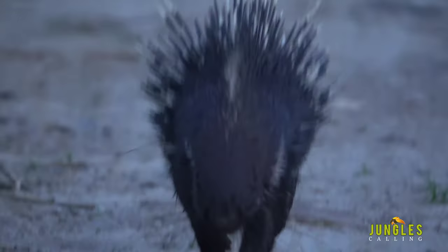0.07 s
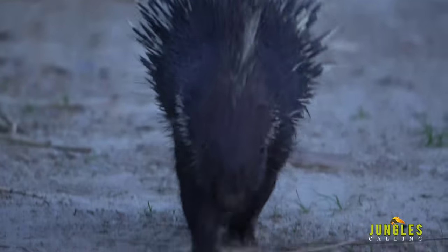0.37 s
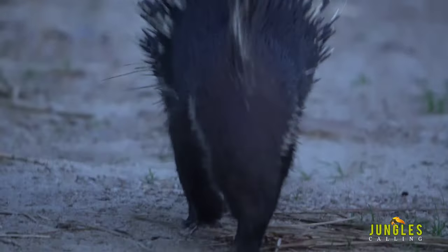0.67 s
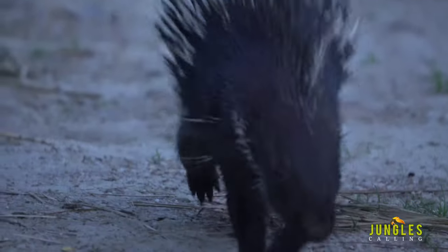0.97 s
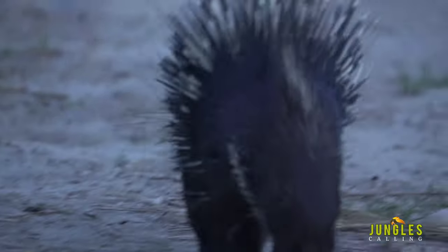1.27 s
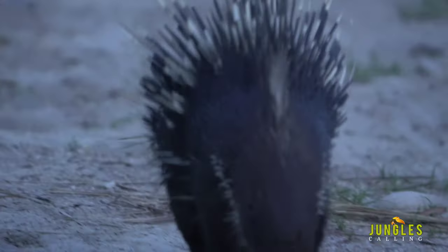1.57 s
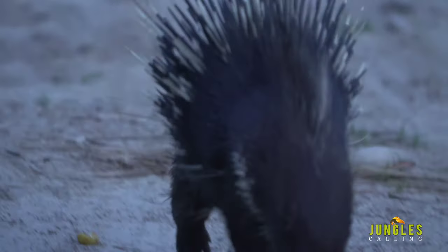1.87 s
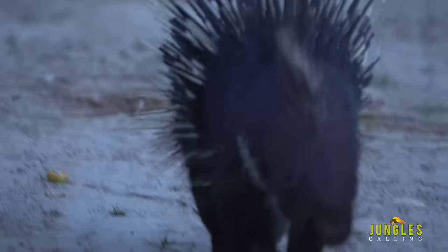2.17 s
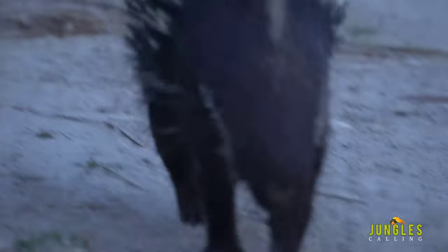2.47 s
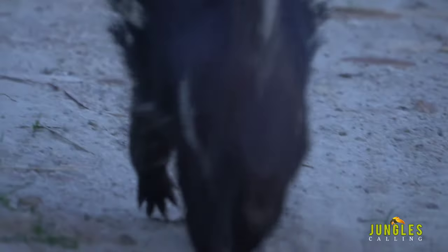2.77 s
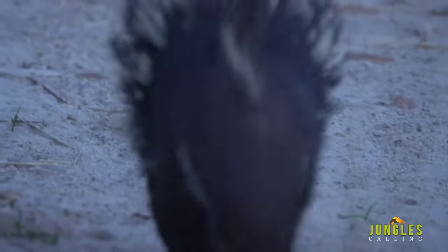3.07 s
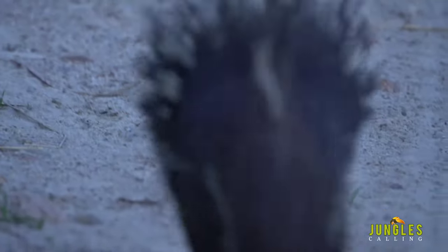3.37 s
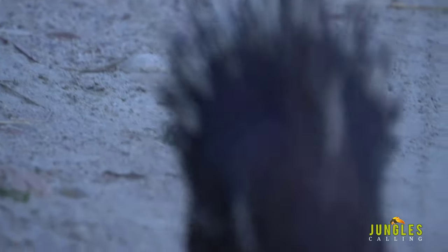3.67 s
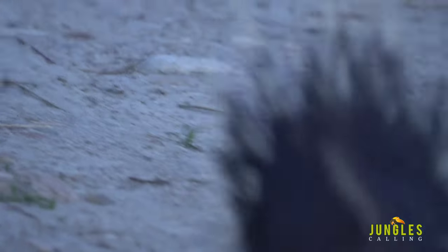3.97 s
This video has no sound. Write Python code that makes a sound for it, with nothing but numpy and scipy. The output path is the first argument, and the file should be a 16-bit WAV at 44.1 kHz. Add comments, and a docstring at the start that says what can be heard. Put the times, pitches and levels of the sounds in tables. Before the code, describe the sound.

Crickets trill and chirp steadily in open bush at night over a soft hiss. A nearby frog gives a short, loud rattling croak, a small bird twitters faintly, and the frog croaks again. Distant clucks sound behind.

```python
"""Night in the bush

A near cricket trills, one tone to each wing stroke; bush crickets and a katydid chirp, buzz and rasp
over a far insect chorus. Frogs rattle as clicks excite their throat resonances, distant clucks sound,
and a small bird twitters in gliding tones. Far whistles, a squeak, dull thuds, hiss and a soft low rush
lie behind. Scattering from open ground and bushes gives trills, rattles and whistles a thin echo."""
import sys
import numpy as np
from scipy import signal
from scipy.fft import rfft, irfft
from scipy.io import wavfile
from scipy.ndimage import uniform_filter1d

SR = 44100
rng = np.random.default_rng(int(sys.argv[2]) if len(sys.argv) > 2 else 0)


def store_wav(level_fs):
    """Save 16-bit WAV to argv[1]."""
    pcm = np.round(np.clip(np.atleast_2d(level_fs), -1, 1) * 32767)
    wavfile.write(sys.argv[1], SR, pcm.T.astype(np.int16))


N = 176400

# Near cricket's trills. Each row: first pulse in seconds, last pulse in seconds, stroke rate in Hz.
TRILLS = [(.241, 2.594, 30.17), (2.952, 4.005, 30.35)]
# Envelope of the trills. Each row: time in seconds, level in dB.
TRILL_LEVEL = [(.2, -52), (1.0, -47), (1.35, -42.5), (1.7, -36), (2.55, -34), (2.95, -42), (3.2, -37),
               (3.45, -38.5), (3.72, -31), (4, -38.5)]
# Frog rattles. Each row: start in seconds, length in seconds, level in dB, pitch in Hz, swell in dB,
# left over right in dB, echo gain in dB.
RATTLES = [(-.07, 0.11, -36, 2010, 12, 14, 2), (1.1547, 0.11, -13.5, 2067, 13, 22, -8),
           (2.049, 0.13, -35.5, 2010, 2.5, 4, -2.5), (2.721, .14, -32.5, 2104, 9, 24, -8),
           (3.175, 0.12, -38.5, 2206, 8, 3, -3), (3.8604, 0.13, -19.5, 2080, 8.5, 5, -25)]
# Modes of a frog's throat. Each row: ratio to the pitch, gain in dB, 60 dB decay time in seconds.
THROAT_MODES = [(1.0, 0, .012), (.835, -7, .012), (.58, -15, .018), (1.12, -13, .009)]
# Rasp of a frog's click. Each row: frequency in Hz, relative level in dB.
GRIT_SPECTRUM = [(400, -32), (900, -14), (1180, -7), (1430, -17), (1720, -2), (2100, 0), (2500, -7),
                 (2900, -20), (4500, -42)]
# Bush cricket's chirps. Each row: start in seconds, end in seconds.
CHIRPS = [(.069, .211), (.259, .416), (.456, .594), (.648, .781), (.855, .981), (1.021, 1.156),
          (1.223, 1.359), (1.427, 1.563), (1.63, 1.731), (1.806, 1.881), (1.946, 1.999), (2.048, 2.129),
          (2.204, 2.283), (2.354, 2.412), (2.448, 2.498), (2.549, 2.626), (2.658, 2.755), (2.812, 2.942),
          (2.99, 3.143), (3.193, 3.333), (3.375, 3.528), (3.574, 3.724), (3.771, 3.914), (3.968, 4.1)]
# Bush cricket's wing resonance. Each row: frequency in Hz, relative level in dB.
WING_SPECTRUM = [(7000, -47.5), (7600, -28), (7780, 1), (7950, 1), (8040, 1.5), (8130, -6), (8250, -13.5),
                 (8400, -30), (8600, -41)]
# Dry buzzes. Each row: start in seconds, end in seconds, level in dB.
BUZZES = [(-.25, 0.173, -39.5), (1.436, 1.876, -38.5), (3.083, 3.541, -38)]
# Spectrum of a buzz. Each row: frequency in Hz, relative level in dB.
BUZZ_SPECTRUM = [(1500, -55), (2900, -27), (3400, -12), (3750, 0), (4130, -1), (4420, -9), (4800, -17),
                 (5300, -25), (6000, -35), (8000, -55)]
# Katydid's rasps. Each row: start in seconds, end in seconds.
RASPS = [(-.12, .033), (.144, .357), (.519, .69), (.866, 1.055), (1.217, 1.395), (1.55, 1.713),
         (1.796, 1.98), (2.1, 2.287), (2.479, 2.665), (2.893, 3.067), (3.221, 3.397), (3.513, 3.672),
         (3.799, 3.9)]
# Spectrum of those rasps. Each row: frequency in Hz, relative level in dB.
RASP_SPECTRUM = [(8500, -21.5), (9300, -2.5), (10300, -7.5), (12300, -10), (13700, -1.5), (14700, -8),
                 (16000, -20)]
# Bird's slurs. Each row: start and length in seconds, first, middle and last pitch in Hz,
# relative level in dB.
BIRD_NOTES = [(1.476, .03, 2300, 2540, 2760, -50.5), (1.51, 0.027, 3230, 2810, 2140, -50),
              (1.554, 0.029, 2890, 2400, 2780, -50.5), (1.639, 0.034, 2430, 2550, 2750, -49.5),
              (1.687, 0.019, 3180, 2840, 2400, -46.5), (1.841, 0.027, 3200, 3040, 2700, -47.5),
              (1.88, 0.018, 3220, 2950, 2600, -47), (1.901, 0.032, 2410, 2513, 2525, -43),
              (1.936, 0.023, 3120, 2910, 2300, -43.5), (1.977, 0.023, 3190, 2436, 2730, -44.5),
              (2.004, 0.025, 3010, 2900, 3080, -45), (2.027, 0.014, 3070, 2730, 2350, -52),
              (2.206, 0.018, 3100, 2860, 2490, -48), (2.249, 0.04, 3050, 2760, 2870, -51.5),
              (2.296, 0.034, 2390, 2486, 2537, -41.5), (2.336, .019, 3100, 2976, 2170, -44.5),
              (2.366, 0.032, 3210, 2400, 2770, -45.5), (2.395, 0.033, 2870, 3020, 2910, -41.5),
              (2.425, .012, 3020, 2700, 2320, -50)]
# Distant clucks. Each row: start in seconds, relative level in dB, pitch in Hz, bright edge in dB.
CLUCKS = [(0.389, -51, 843, -48), (.493, -48, 556, -50), (0.781, -46.5, 630, -44.5), (1.052, -44, 714, -54),
          (1.455, -45, 762, -48), (1.841, -44.5, 735, -51), (1.947, -50.5, 770, -65),
          (2.194, -54, 694, -47.5), (2.362, -52, 714, -62), (2.643, -51.5, 452, -54),
          (3.588, -43.5, 996, -73)]
# Far whistles. Each row: start and end in seconds, pitch in Hz, fall in Hz per second, level in dB.
WHISTLES = [(-.02, 0.22, 2110, 101, -51), (0.197, 0.485, 2246, 195, -51), (3.595, 3.733, 1035, 980, -52.5)]
# One very high squeak. Each row: frequency in Hz, relative level in dB.
SQUEAK_SPECTRUM = [(8000, -45), (10500, -16), (12200, -17), (13300, -4), (14500, -2), (15600, -3),
                   (16500, -12)]
# Envelope of the far chorus near 3.7 kHz. Each row: time in seconds, level in dB.
CHORUS_LEVEL = [(0, -42.5), (.3, -50.5), (.85, -47.5), (1.35, -50), (2.0, -51.5), (2.55, -46), (2.75, -49),
                (2.9, -57), (3.05, -48), (3.7, -50.5), (4, -49.5)]
# Faint, farther chirps. Each row: start in seconds, end in seconds, level in dB.
FAR_CHIRPS = [(0.237, .36, -55), (0.65, .82, -58), (1.112, 1.292, -55), (1.576, 1.703, -49),
              (2.373, 2.53, -53.5), (2.774, 2.874, -56), (3.226, 3.414, -51), (3.682, 3.906, -55.5)]
# Shimmer of far bush crickets. Each row: frequency in Hz, relative level in dB.
SHIMMER_SPECTRUM = [(6500, -39), (7000, -4), (7400, -10), (7770, 3.5), (8100, -8), (8350, -34), (8600, -60)]
# Soft low thuds. Each row: start in seconds, level in dB.
THUDS = [(0.349, -64.5), (.46, -70), (.735, -68), (1.15, -65), (3.585, -76)]
# Still night air and countless far insects. Each row: frequency in Hz, relative level in dB.
AIR_SPECTRUM = [(500, -26), (1000, -15), (1400, -17.5), (2200, -12.5), (2900, -13.5), (3700, 0.5),
                (4500, -18), (5600, -13.5), (6300, -6.5), (7100, -17), (8100, 3), (8550, -22),
                (9300, -16.5), (10200, -25), (12000, -26), (14000, -22.5), (15500, -26)]
# Soft low rush. Each row: frequency in Hz, relative level in dB.
RUSH_SPECTRUM = [(25, -56), (55, -26.5), (150, -19), (280, 5), (450, 5), (700, 2.5), (1100, 6), (1450, -7),
                 (2100, 1), (3200, -8.5), (8000, -61)]
# Envelope of the rush. Each row: time in seconds, level in dB.
RUSH_LEVEL = [(0, -60.5), (.35, -57.5), (.7, -64.5), (.92, -56), (1.2, -51), (1.7, -59.5), (2.1, -59.5),
              (2.3, -63.5), (2.58, -69.5), (2.8, -55), (2.9, -57.5), (3.0, -52.5), (3.24, -51), (3.35, -62),
              (3.55, -58), (3.75, -50.5), (4, -53)]

TRILL_HZ, TRILL_SAG_HZ_PER_S, STROKE_S = 7351, 11500, 0.027
RATTLE_RATE_HZ, RATTLE_FALL_DB, RATTLE_CREST_SHARE = 78, 6.5, 0.71
CLICK_ATTACK_S, SECOND_CLICK_S, GRIT_DECAY_S = 0.00035, 0.0031, 0.0035
CHIRP_HZ, CHIRP_WAVER_HZ, CHIRP_LAG_RAD, CHIRP_GAP_DB = 8096, 69.6, 2.58, -21
ECHO_T60_S, TOP_HZ = 0.41, 15650
TIME = np.arange(N) / SR


def undb(db):
    """Amplitude ratio of a level in decibels."""
    return 10 ** (np.asarray(db) / 20)


def unit(x):
    """Normalisation to an rms of 1."""
    return x / np.sqrt(np.mean(x ** 2) + 1e-20)


def curve(rows):
    """Amplitude envelope, interpolated in decibels."""
    return undb(np.interp(TIME, *np.array(rows).T))


def colour(x, spectrum):
    """Spectral shaping over log frequency, at unit rms."""
    hz, db = np.array(spectrum).T
    f = np.maximum(np.fft.rfftfreq(N, 1 / SR), 1)
    gain = undb(np.interp(np.log(f), np.log(hz), db))
    return unit(irfft(rfft(x) * gain, N))


def band(x, hz, half_width_hz):
    """Two equal resonators in cascade pass one band, at unit rms."""
    f = np.maximum(np.fft.rfftfreq(N, 1 / SR), 1)
    detuning = (f - hz * hz / f) / (2 * half_width_hz)
    return unit(irfft(rfft(x) / (1 + 1j * detuning) ** 2, N))


def pan(db):
    """Interaural level difference at constant power, positive to the left."""
    return unit(undb(np.array([[db], [-db]]) / 2))


def noise(correlation):
    """Partly coherent white noise for two ears."""
    mid, side = rng.standard_normal((2, N))
    opposed = np.array([side, -side])
    return (np.sqrt(1 + correlation) * mid + np.sqrt(1 - correlation) * opposed) / np.sqrt(2)


def wander(rate_hz):
    """Smooth random modulation of unit rms."""
    hold = max(int(SR / rate_hz), 2)
    steps = rng.standard_normal(2000)
    return unit(uniform_filter1d(steps[(np.arange(N) // hold) % len(steps)], hold))


def strokes(rate_hz, jitter, sharp):
    """Quasi-periodic envelope of uneven wing strokes."""
    cycles = np.cumsum(rate_hz * (1 + jitter * wander(rate_hz / 2))) / SR
    return unit(np.exp(sharp * np.cos(2 * np.pi * cycles)))


def gate(start, end, attack_s, release_s):
    """Trapezoidal envelope: attack, hold, release."""
    return np.clip((TIME - start) / attack_s, 0, 1) * np.clip((end - TIME) / release_s, 0, 1)


def swell(age, rise_s):
    """Critically damped pulse: it rises to 1, then dies away."""
    return age / rise_s * np.exp(1 - age / rise_s)


def glide(hz, lag_rad=0):
    """A sine whose phase is the integral of its frequency."""
    return np.sin(2 * np.pi * np.cumsum(hz) / SR - lag_rad)


def add(out, start, x):
    """Superposition of a short sound at a start time in seconds."""
    i = int(round(start * SR))
    a, b = max(i, 0), min(i + x.shape[-1], N)
    if b > a:
        out[..., a:b] += x[..., a - i:b - i]


def echo(x):
    """Scattering from ground and bushes: a decaying tail, different for each ear."""
    t = np.arange(SR) / SR
    envelope = np.exp(-np.log(1000) * t / ECHO_T60_S) * (1 - np.exp(-t / 0.0013))
    tail = unit(rng.standard_normal((2, SR)) * envelope) / np.sqrt(SR)
    return signal.fftconvolve(x[None], tail, axes=1)[:, :N]


def cricket():
    """Stridulation: each wing stroke radiates a pure tone that swells and sags in pitch."""
    out, t = np.zeros(N), np.arange(-STROKE_S / 2, STROKE_S / 2, 1 / SR)
    window = np.cos(np.pi * t / STROKE_S) ** 2
    for first, last, rate in TRILLS:
        times = np.linspace(first, last, int(round((last - first) * rate)) + 1)
        for at, (detune, force) in zip(times, rng.standard_normal((200, 2))):
            tone = glide(TRILL_HZ + 28 * detune - TRILL_SAG_HZ_PER_S * t)
            add(out, at - STROKE_S / 2, undb(0.2 * force) * window * tone)
    out = out * curve(TRILL_LEVEL) * undb(0.4 * wander(300))
    return out * pan(55.5) + undb(-10) * echo(out)


def frogs():
    """Impulse excitation: rough double clicks ring the throat's damped modes in a swelling rattle."""
    out, t = 0, np.arange(int(0.03 * SR)) / SR
    grit = colour(rng.standard_normal(N), GRIT_SPECTRUM)
    attack = (1 - np.exp(-t / CLICK_ATTACK_S)) ** 2
    for start, length, db, hz, swell_db, pan_db, echo_db in RATTLES:
        call = np.zeros(N)
        ages = np.arange(0, length, 1 / RATTLE_RATE_HZ)
        for age, (detune, force, slip, shift) in zip(ages, rng.standard_normal((20, 4))):
            phase = 2 * np.pi * hz * (1 + 0.018 * detune) * t
            ring = sum(undb(mode_db) * np.sin(ratio * phase) * np.exp(-np.log(1000) * t / t60)
                       for ratio, mode_db, t60 in THROAT_MODES)
            rasp = undb(-12.5) * np.roll(grit, int(shift * SR))[:len(t)] * np.exp(-t / GRIT_DECAY_S)
            arch_db = np.interp(age / length, [0, RATTLE_CREST_SHARE, 1], [-swell_db, 0, -RATTLE_FALL_DB])
            envelope = attack * undb(db + force / 2 + arch_db)
            at = start + age + 0.0004 * slip
            gap_s = round(SECOND_CLICK_S * hz + shift / 2) / hz  # whole periods of the call's pitch
            add(call, at, (ring + rasp) * envelope)
            add(call, at + gap_s, 0.93 * ring * envelope)
        call = signal.sosfilt(signal.butter(3, 750, "high", fs=SR, output="sos"), call)
        out = out + call * pan(pan_db) + undb(echo_db) * echo(call)
    return out


def bush_cricket():
    """Wing resonance: fast strokes pulse a wavering tone with a scraping fringe."""
    chirps = sum(gate(start - 0.004, end + 0.0054, 0.01, 0.01) for start, end in CHIRPS)
    pitch = CHIRP_HZ + CHIRP_WAVER_HZ * wander(220)
    tone = np.sqrt(2) * glide(pitch, np.array([[0], [CHIRP_LAG_RAD]]))  # the right ear lags
    scrape = undb(-3) * colour(noise(-0.48), WING_SPECTRUM)
    wing = unit(tone + scrape) * strokes(112.6, jitter=0.066, sharp=0.5)
    return wing * (chirps + undb(CHIRP_GAP_DB)) * undb(-40) * pan(2.44)


def buzzes():
    """Source and filter: rapid, uneven ticks make a dry buzz that peaks near 4 kHz."""
    envelope = sum(gate(start, end, 0.046, 0.036) * undb(db) for start, end, db in BUZZES)
    ticks = noise(0.56) * strokes(270, jitter=0.15, sharp=0.7)
    return colour(ticks, BUZZ_SPECTRUM) * envelope * pan(-2.0)


def katydid():
    """Friction noise: wing strokes scrape out thin phrases near the top of hearing."""
    phrases = sum(gate(start - 0.005, end + 0.019, 0.017, 0.035) for start, end in RASPS)
    scrape = colour(noise(0.4), RASP_SPECTRUM) * strokes(200, jitter=0.25, sharp=0.17)
    return scrape * phrases * undb(-55.5) * pan(0.41)


def bird():
    """Frequency modulation: each quick whistle follows a parabola through three pitches."""
    out = np.zeros(N)
    for start, length, *pitches, db in BIRD_NOTES:
        progress = np.linspace(0, 1, int(length * SR))
        hz = np.polyval(np.polyfit([0, 0.5, 1], pitches, 2), progress)
        envelope = np.abs(np.sin(np.pi * progress)) ** 0.2
        add(out, start, np.sqrt(2) * undb(db) * envelope * glide(hz))
    flutter = undb(2.5 * wander(250) - 2)
    return out * flutter + undb(-5) * echo(out)


def clucks():
    """Damped oscillation: a short, hollow note in a puff of noise, with a bright edge."""
    out = 0
    edge = band(noise(0.49), 2090, 1000)
    for at, db, hz, edge_db in CLUCKS:
        age = np.maximum(TIME - at, 0)
        note = undb(-9) * np.sin(2 * np.pi * hz * age) * swell(age, 0.012)
        puff = undb(-2) * band(noise(0.8), hz, 300) * swell(age, 0.0066)
        out = out + (note + puff) * undb(db) + edge * undb(edge_db) * swell(age, 0.0054)
    return out


def squeak():
    """A noise transient: one very high squeak with exponential rise and decay."""
    envelope = np.exp(-np.abs(TIME - 3.151) / 0.0099)
    return colour(noise(0.55), SQUEAK_SPECTRUM) * envelope * undb(-36.5) * pan(7.4)


def whistles():
    """Direct plus scattered sound: far, wavering notes sink and fade."""
    out = 0
    for start, end, hz, fall_hz_per_s, db in WHISTLES:
        pitch = hz - fall_hz_per_s * np.maximum(TIME - start, 0) + 45 * wander(200)
        envelope = gate(start, end, 0.01, 0.75 * (end - start)) * undb(db + 1.3 * wander(90))
        note = glide(pitch) * envelope
        out = out + note + echo(note)
    return out


def chorus():
    """Incoherent summation: far insects merge into throbbing bands of noise."""
    throb = band(noise(0.14) * strokes(84, jitter=0.2037, sharp=0.17), 3695, 580)
    envelope = sum(gate(start, end, 0.022, 0.013) * undb(db) for start, end, db in FAR_CHIRPS)
    chirps = band(noise(0), 6480, 430) * strokes(38, jitter=0.13, sharp=0.22) * envelope
    shimmer = colour(noise(-0.27), SHIMMER_SPECTRUM) * strokes(55, jitter=0.198, sharp=0.31) * undb(-50)
    trill = band(noise(0), 7030, 220) * strokes(31, jitter=0.044, sharp=0.78) * undb(-56)
    return throb * curve(CHORUS_LEVEL) * pan(5.5) + chirps * pan(3) + shimmer * pan(0.95) + trill * pan(5.7)


def thuds():
    """Gated low-frequency noise: faint, dull bumps."""
    envelope = sum(gate(at, at + 0.043, 0.0063, 0.024) * undb(db) for at, db in THUDS)
    return band(noise(0.92), 90, 68) * envelope


def air():
    """Ambient noise: a smooth far hiss over a low rush that swells, sinks and flickers."""
    hiss = colour(noise(0.25), [(20, -90), (200, -75)] + AIR_SPECTRUM) * undb(-50 + 0.39 * wander(5))
    rush = colour(noise(0.69), RUSH_SPECTRUM) * curve(RUSH_LEVEL) * undb(1.2 * wander(35))
    return hiss * pan(0.87) + rush * pan(0.38)


def scene():
    """Linear superposition of all the voices of the night."""
    insects = cricket() + bush_cricket() + katydid() + buzzes() + chorus()
    calls = frogs() + clucks() + bird() + squeak() + whistles()
    return insects + calls + thuds() + air()


def record(dry):
    """Band limiting: a steep elliptic low-pass cuts the top of the treble."""
    return signal.sosfilt(signal.ellip(10, 0.1, 80, TOP_HZ, fs=SR, output="sos"), dry)


dry = scene()
out = record(dry)
store_wav(out)
```